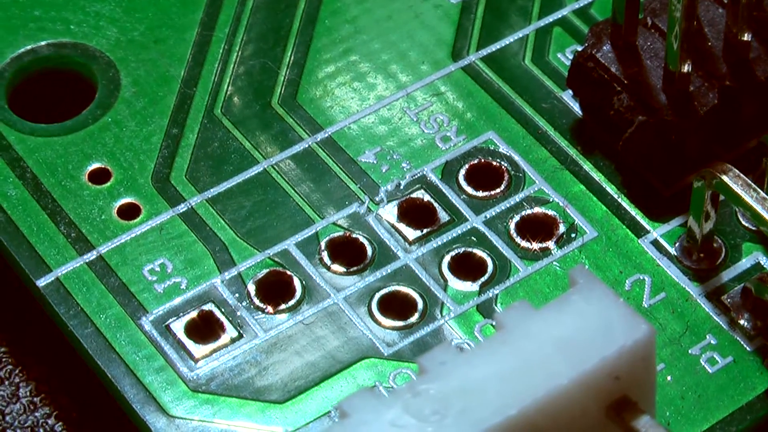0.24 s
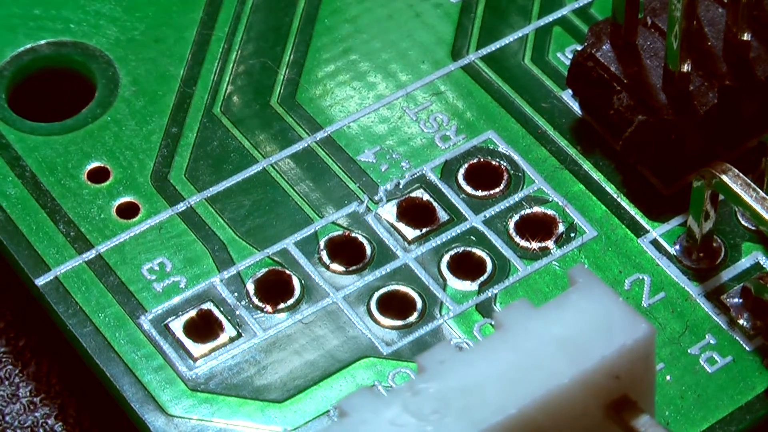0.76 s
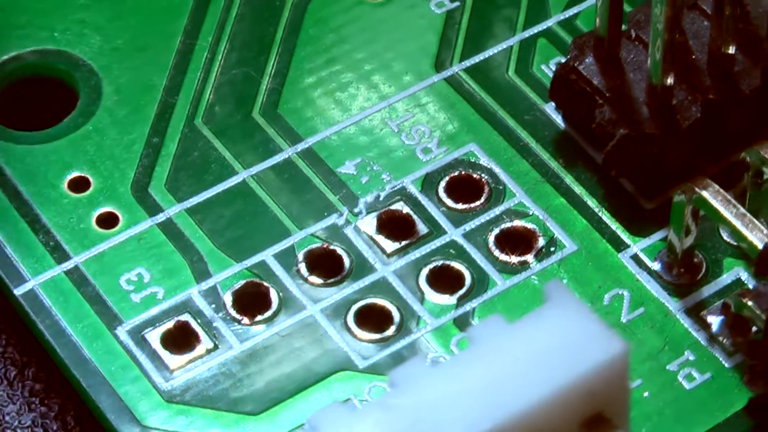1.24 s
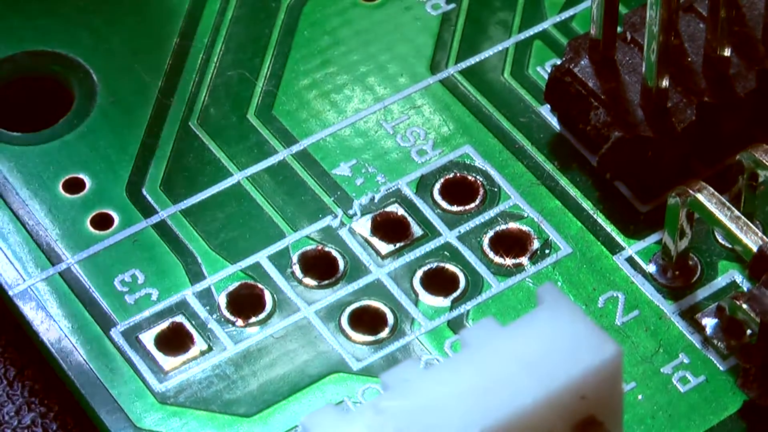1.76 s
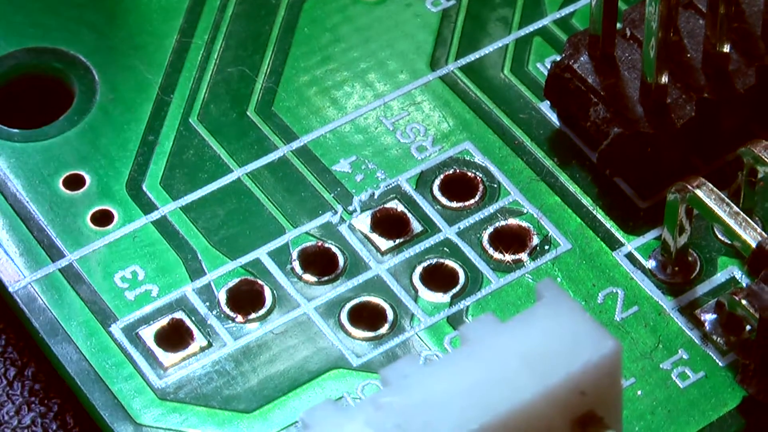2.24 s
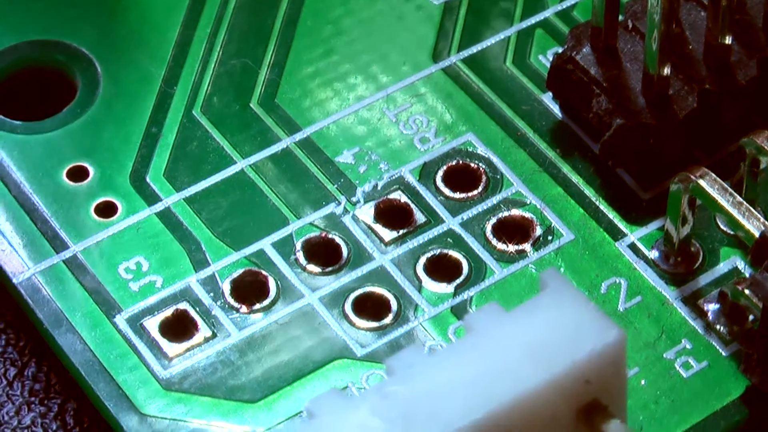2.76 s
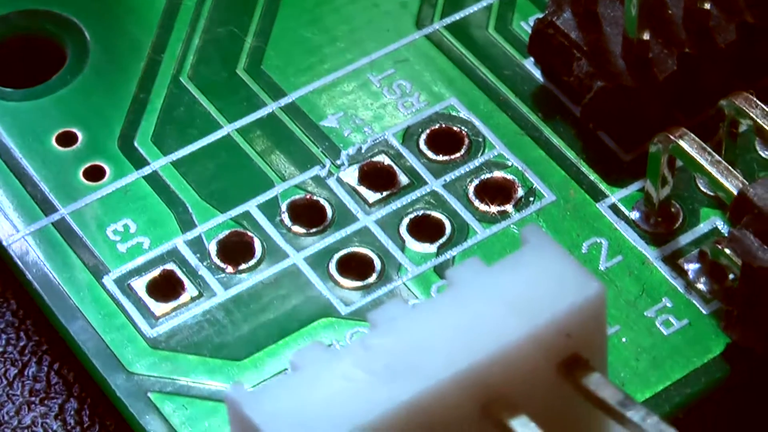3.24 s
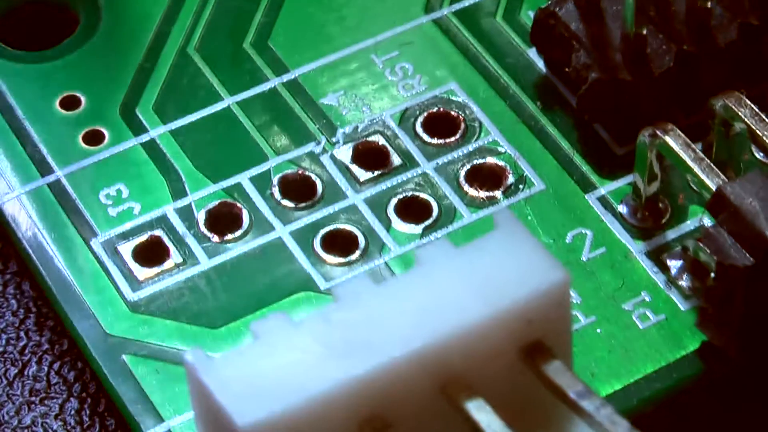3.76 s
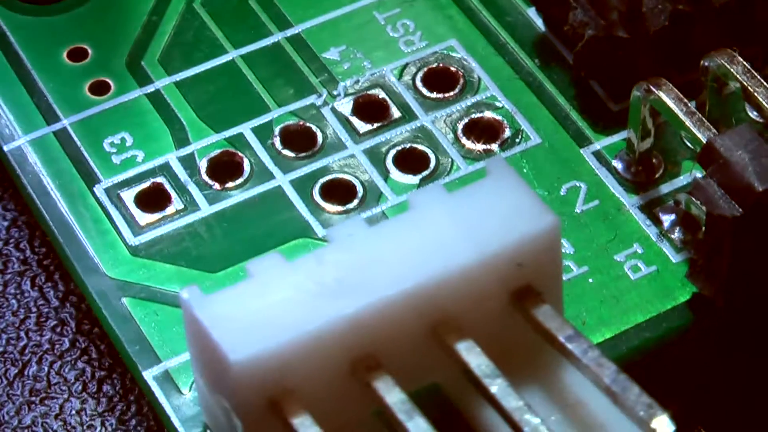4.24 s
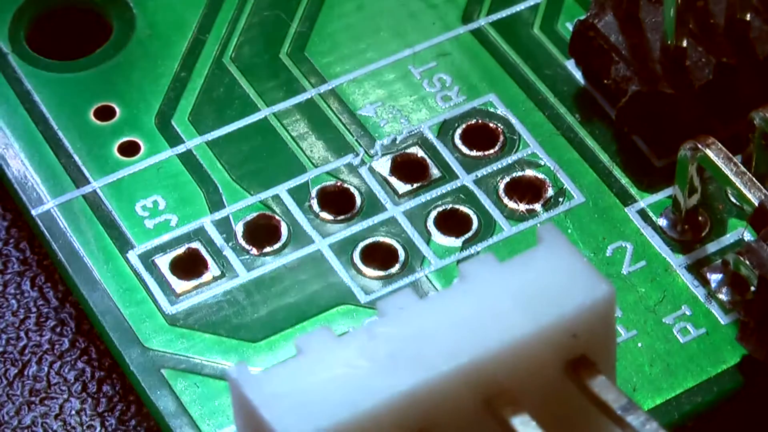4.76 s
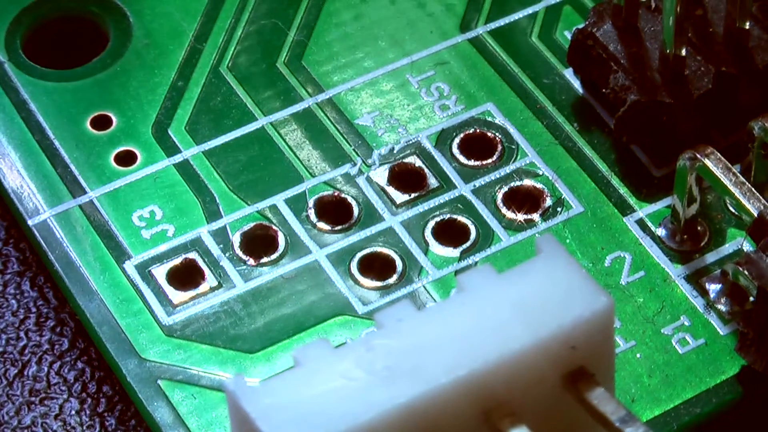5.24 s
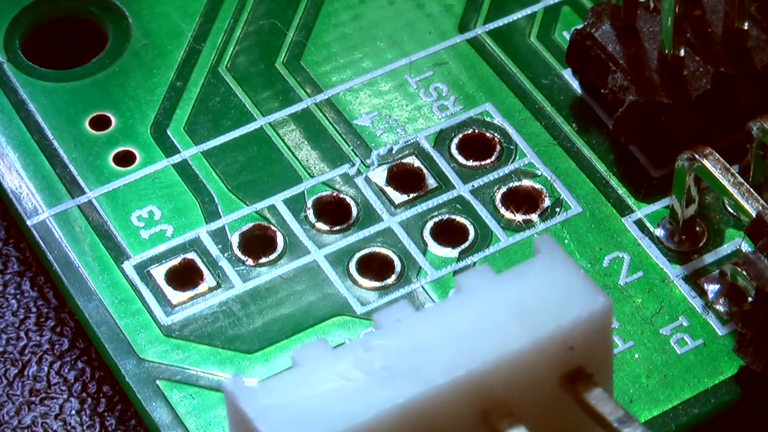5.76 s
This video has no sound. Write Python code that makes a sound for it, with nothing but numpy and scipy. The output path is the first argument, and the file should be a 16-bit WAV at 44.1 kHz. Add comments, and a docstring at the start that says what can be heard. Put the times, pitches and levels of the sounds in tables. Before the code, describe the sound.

Heard close up in a quiet room, a sharp click and a bump lead into the stuttering creak of a stiff metal stand being adjusted. Light knocks and dry ticks follow. Then a circuit board is pushed across a mat, scraping twice in quick succession and brushing more softly afterwards. A few small taps end it, with faint cloth rustle and a low, steady fan hum underneath.

```python
"""A stiff joint creaks in quick jerks as a circuit board is pushed about under a microscope.
The joint of the stand sticks and slips, and each slip makes the stand ring; early on it also groans.
Later the board scuffs and catches on its mat. Small knocks and dry ticks are dotted throughout.
Behind it all the joint hisses as it rubs, a sleeve rustles and a small fan hums in a quiet room."""
import sys
import numpy as np
from scipy import signal
from scipy.fft import rfft, irfft
from scipy.io import wavfile
from scipy.ndimage import uniform_filter1d

SR = 44100
rng = np.random.default_rng(int(sys.argv[2]) if len(sys.argv) > 2 else 0)


def master_out(mix):
    """Clip the mix to full scale and print it as 16-bit PCM to the path in sys.argv[1]."""
    frames = np.transpose(np.atleast_2d(mix))
    ceiling = np.clip(frames, -1, 1)
    pcm = np.round(ceiling * 32767).astype(np.int16)
    wavfile.write(sys.argv[1], SR, pcm)


N = 264644

# Each jerk of the joint: (time [s], crack level [dB], thump level [dB])
JERKS = [(0.0376, -29.5, -39.5), (.18, -22.5, -34.5), (0.1937, -30.5, -42), (.563, -22, -40.5),
         (0.5692, -40, -42.5), (.577, -33, -41.5), (0.5875, -27.5, -34), (0.605, -26, -37.5),
         (.615, -36, -44), (0.6237, -29, -34), (0.635, -31, -34.5), (0.6468, -30, -40), (.665, -29.5, -45),
         (.6783, -30, -45), (.684, -38, -43), (0.694, -31, -47), (.7138, -27, -35), (0.7324, -26.5, -37),
         (0.7487, -24.5, -32.5), (0.756, -32, -51), (0.7692, -32, -36.5), (0.781, -30, -41),
         (.7934, -26, -35), (0.8041, -34, -60), (0.8154, -27.5, -40), (0.8242, -36.5, -43),
         (.842, -26, -37), (0.878, -48, -42), (0.8992, -29, -31.5), (0.924, -41, -40), (.9349, -18.5, -28),
         (0.9739, -30, -37.5), (.996, -19, -31), (1.016, -35, -34), (1.0397, -25.5, -29),
         (1.0944, -25.5, -33), (1.115, -23.5, -29.5), (1.133, -17, -31), (1.151, -23.5, -38),
         (1.1668, -25, -33), (1.1906, -33, -36.5), (1.2122, -19.5, -29), (1.35, -25, -32.5),
         (1.3642, -26.5, -37), (1.3892, -23, -31), (1.4059, -20, -33.5), (1.4238, -39, -41),
         (1.4363, -37.5, -36), (1.4486, -24.5, -35), (1.4637, -25.5, -36.5), (1.4825, -48.5, -41),
         (1.4964, -26.5, -32), (1.509, -18.5, -31.5), (1.529, -28, -41), (1.5418, -15.5, -26.5),
         (1.5569, -14.5, -29), (1.5797, -20.5, -35.5), (1.6693, -17, -30)]
# How the jerks change colour as the joint turns: (time [s], squeak pitch [Hz], squeak boost [dB],
# base boost [dB], snap boost [dB])
JOINT_COLOUR = [(.04, 5740, -14, -8.5, -2.5), (.18, 7070, -1, -3.5, -13), (.565, 4670, 5.5, 5.5, -16),
                (.588, 6030, 4.5, -0.5, -5.5), (.66, 6260, 1, -10, -9), (.70, 5620, 5, -14, -7),
                (.81, 5580, -2, -4.5, -8), (.89, 5250, -13, -2, -9), (1.0, 5400, -4, -1, -9),
                (1.04, 4650, -12, -2, -19.5), (1.14, 4740, -0.5, 1.5, -11), (1.36, 4820, -7, 0, -12.5),
                (1.46, 4620, -2.5, 3.5, -25), (1.55, 4670, -6.5, -0.5, -18), (1.67, 4450, -1.5, 3, -16.5)]
# Rubbing between jerks, one list a push: (time [s], grind level [dB], hiss level [dB])
JOINT_RUBBING = [
    [(.56, -62, -76), (.6, -40, -57), (.7, -49, -59), (.78, -48, -47), (.87, -70, -61), (.93, -80, -82),
     (1.03, -80, -48), (1.08, -80, -70)],
    [(1.09, -38, -63), (1.16, -41, -47), (1.25, -53.5, -64)],
    [(1.35, -60, -71), (1.45, -58.5, -62), (1.56, -34, -45), (1.63, -51, -63)],
]
# The notes that the joint and the stand ring at; a wider note dies sooner:
# (pitch [Hz], width [Hz], level [dB], left over right [dB], left ahead by [rad])
JOINT_NOTES = [(2557, 164, -3.5, 1, 0.58), (2945, 110, 0, 3, -0.75), (3510, 82, 3, 5.5, 0.68),
               (4055, 43, 6.5, 5, 0.42), (4560, 96, -4, 9, 0.98), (5460, 200, -2, 7, -0.48),
               (6310, 110, -11, -2, 0.33), (7180, 310, -9.5, 7, -0.79), (7930, 430, -14, 7, -0.88),
               (9470, 450, 1.5, 2.2, -0.15), (10640, 250, -6.5, -4, -0.66), (10970, 520, -13, -15, 0.17),
               (13630, 1100, -7, 3.5, 0.38), (15260, 380, -6, -4, -0.36), (14700, 460, -20, -7, -0.18)]
STAND_NOTES = [(183.5, 40, 1.5, 5, 0.058), (205.6, 18.6, -1, 2, -0.54), (223, 30, -2.5, 0, -0.058),
               (286, 23, -1.5, -2, 0.17), (316.5, 17, 2, -1.5, 0.73), (477, 39, -8.5, 7.5, -0.59),
               (560.5, 27, -3.5, 2, 0.65), (652, 22.5, -3.5, 3, 0.3), (809, 92, -9.5, 0, -0.15),
               (872, 36, -0.5, -6, 0.92), (958, 57, -0.5, -3, 0.93), (1086, 32, -7, 9.5, -0.62),
               (1167, 28, -6, 2, -0.81), (1207, 27, 0, -6.5, -0.32), (1306, 105, -3.5, 5, -0.97),
               (1465, 39.5, 1, -4, 0.55), (1624, 140, -5, 0, 1.58), (1855, 37, -7.5, -2, -0.25),
               (2074, 90, -6.5, 0, 0.52)]
def stand_creak():
    """Each jerk cracks, snaps and squeaks in the joint and shakes the arm and base of the stand."""
    times, crack_db, thump_db = np.transpose(JERKS)
    colour_times, *colour = np.transpose(JOINT_COLOUR)
    squeak_hz, squeak_db, base_db, snap_db = (np.interp(times, colour_times, c) for c in colour)
    squeak_db += 2.5 * rng.standard_normal(len(times))
    snap_db += 0.23 * (crack_db + 23.5)  # jerks harder than the usual -23.5 dB snap brighter
    grind = loudness_curve(JOINT_RUBBING, column=1) * grit(3000, spread_db=1.5)
    snap = jolts(times, crack_db + snap_db + 18, rise_s=0.00076, fall_s=0.0019, kick=0.29)
    crack = jolts(times, crack_db + 2.5, rise_s=0.00066, fall_s=0.00082, kick=1.1)
    arm = jolts(times, thump_db + 12.5, rise_s=0.00069, fall_s=0.0065, kick=1.99)
    base = jolts(times, thump_db + base_db + 14, rise_s=0.00073, fall_s=0.002, kick=2.53)
    out = ring(crack, JOINT_NOTES[:7]) + ring(snap, JOINT_NOTES[7:])
    out += ring(base + grind, STAND_NOTES[:11]) + ring(arm + gain(-6.5) * grind, STAND_NOTES[11:])
    t = np.arange(600) / SR
    for start, hz, db in zip(times, squeak_hz, crack_db + squeak_db):
        squeak = rise_and_fall(t, 0.0011, 0.0011) * np.sin(2 * np.pi * hz * t)
        add(out, start, gain(db + np.array([[2.5], [-2.5]])) * squeak)  # louder on the left
    return cut_bass(out, hz=148, order=6)

# The groan during the first push: (time [s], pitch [Hz], level [dB])
GROAN_PATH = [(.625, 661, -60), (.644, 650, -40.5), (.68, 647.6, -49.5), (.744, 663.5, -45),
              (.836, 635, -52.5), (.9, 658, -63)]
def stand_groan():
    """One note of the stand sounds on, nearly steady, with two rougher overtones above it."""
    times, hz, db = np.transpose(GROAN_PATH)
    t = np.arange(times[0], times[-1], 1 / SR)
    phase = 2 * np.pi * np.cumsum(np.interp(t, times, hz)) / SR
    wobble = unit_level(uniform_filter1d(rng.standard_normal((3, len(t))), size=500, axis=1))
    overtones = (1 + 0.53 * wobble[1]) * np.sin(2 * phase) + (1 + wobble[2]) * np.sin(3 * phase)
    tone = np.sqrt(2) * ((1 + 0.25 * wobble[0]) * np.sin(phase) + gain(-15) * overtones)
    out = np.zeros(N)
    add(out, times[0], gain(np.interp(t, times, db)) * tone * signal.windows.tukey(len(t), .1))
    return out

# Each drag of the board on its mat: (time of full pressure [s], level [dB], hold [s])
BOARD_DRAGS = [(3.44, -42.5, 0.0075), (3.529, -29.5, 0.0049), (3.744, -33.5, 0.013), (3.762, -30.5, .012),
               (3.865, -44.5, 0.013), (3.91, -45.5, 0.011), (3.964, -48, 0.013), (4.417, -46, .004),
               (4.495, -50.5, 0.048), (4.704, -47.5, 0.045), (4.788, -47, .01), (4.997, -51.5, .006),
               (5.19, -54, 0.02)]
# The edge of the board catches: (time [s], level [dB])
EDGE_CATCHES = [(3.517, -33), (3.529, -32.5), (3.548, -25), (3.555, -23.5), (3.566, -48.5), (3.576, -24),
                (3.735, -24.5), (3.745, -27), (3.762, -28), (3.771, -27), (3.794, -25), (3.965, -35.5),
                (4.416, -37), (4.722, -31.5), (4.784, -36)]
# The notes that the board rings at:
# (pitch [Hz], width [Hz], level [dB], left over right [dB], left ahead by [rad])
BOARD_NOTES = [(106, 45, -12.5, -2, 0.23), (227, 84, -17, 17, -0.87), (500, 72, -6, -1, -0.4),
               (669, 36, -3.5, 1, 0.2), (816, 41, 2.5, -3.5, -0.011), (916, 35, -3, -4, -0.54),
               (1014, 133, -9.5, -6, 0.47), (1230, 18, -15, 10, 1), (1424, 44, -9.5, -3, -0.44),
               (1783, 210, -17.5, -5.5, -0.41), (2145, 29, -12, -3, 1), (2340, 170, -26, 0, 0.9),
               (3080, 300, -24, 3.5, 0.36), (3730, 490, -32, -4, 0.1), (4744, 150, -21, -0.5, 0.2),
               (5820, 290, -28, 0, 0.3), (8650, 1600, -41, 0, 0.56), (13600, 2700, -48, -1, -0.31)]
def board_scuffs(press_db_per_s=1200, lift_db_per_s=422):
    """Grit and catches make the dragged board ring; firm strokes sound brighter than light ones."""
    t, pressure = np.arange(N) / SR, np.zeros(N)
    for at, db, hold_s in BOARD_DRAGS:
        pressing_db = press_db_per_s * np.clip(at - t, 0, .3)
        lifting_db = lift_db_per_s * np.clip(t - at - hold_s, 0, 1)
        pressure += gain(db - pressing_db - lifting_db)
    times, catch_db = np.transpose(EDGE_CATCHES)
    scrape = gain(-6) * pressure * grit(3000, spread_db=3)
    scrape += jolts(times, catch_db + 9.5, rise_s=0.0006, fall_s=0.0015, kick=0.58)
    firmness = (pressure / pressure.max()) ** 0.28
    return ring(scrape, BOARD_NOTES[:7]) + gain(-7) * ring(firmness * scrape, BOARD_NOTES[7:])

# Small knocks on the desk: (time [s], level [dB], pitch [Hz])
DESK_KNOCKS = [(0.113, -20.5, 163.6), (.484, -31, 170), (2.545, -37, 194), (2.672, -36.5, 865),
               (2.795, -36, 221), (2.806, -33, 280), (2.824, -39.5, 307), (2.969, -34, 274),
               (3.066, -33.5, 686), (5.099, -40.5, 465), (5.533, -37, 459), (5.723, -36.5, 236),
               (5.755, -39, 649), (5.844, -36, 473)]
def desk_knocks(rise_s=0.0026, die_away_s=0.084):
    """A soft bump gives a quickly dying tone and a puff of noise around the same pitch."""
    out, t = np.zeros(N), np.arange(4096) / SR
    shape = (1 - np.exp(-t / rise_s)) * gain(-60 * t / die_away_s)
    for start, db, hz in DESK_KNOCKS:
        puff = band_around(rng.standard_normal(len(t)), hz, octaves=1.68)
        add(out, start, gain(db) * shape * (0.55 * np.sin(2 * np.pi * hz * t) + 0.37 * puff))
    return out

# Light, dry ticks: (time [s], level [dB], middle pitch [Hz], fade time [s])
DRY_TICKS = [(.111, -55, 12000, 0.0046), (.122, -33.5, 2230, 0.00088), (.17, -19.5, 2430, 0.00041),
             (.177, -11, 2860, 0.00039), (0.18, -25.5, 2580, 0.0029), (.194, -34.5, 2600, 0.0028),
             (.482, -51, 1160, 0.0093), (0.565, -33, 2500, 0.0047), (1.977, -47.5, 7500, 0.0013),
             (2.07, -51, 3970, 0.0012), (2.088, -56, 11500, .0027), (2.185, -44, 8000, 0.00093),
             (2.239, -51.5, 1100, 0.005), (2.32, -48.5, 1150, 0.0032), (2.659, -53, 3460, 0.015),
             (2.899, -56.5, 2660, .005), (2.974, -35, 2600, 0.00096), (2.9735, -41, 9000, 0.0007),
             (3.061, -56.5, 2860, .012), (5.098, -59, 2800, 0.031), (5.714, -49.5, 1200, 0.01),
             (5.79, -54.5, 5000, .0025), (5.845, -50, 6040, 0.0039), (5.848, -47.5, 1950, .0091)]
def dry_ticks():
    """Each tick is a tiny burst of noise, much alike on the left and right."""
    out, t = np.zeros((2, N)), np.arange(2048) / SR
    for start, db, hz, fall_s in DRY_TICKS:
        hiss = rng.standard_normal((2, len(t)))
        band = band_around(hiss + 1.3 * hiss[0], hz, octaves=1.3)
        add(out, start, gain(db) * band * rise_and_fall(t, 0.0007, fall_s))
    return out

def metal_ping(start_s=.181, db=-53, hz=7070, die_away_s=.11):
    """A small metal part of the stand rings once with a thin, dying tone."""
    out, t = np.zeros(N), np.arange(6000) / SR
    add(out, start_s, gain(db - 60 * t / die_away_s) * np.sin(2 * np.pi * hz * t))
    return out

# How loud the hiss is: the joint's fine rubbing hiss during the creak, sleeve rustle otherwise:
# (time [s], coarse level [dB], fine level [dB])
HISS_LEVELS = [(0, -67.5, -74), (.55, -80, -79.5), (.68, -76, -62), (.95, -78, -79.5), (1.55, -70, -76),
               (1.75, -73.5, -77.5), (2.5, -70.5, -78), (2.68, -61, -72), (2.82, -69.5, -77),
               (2.97, -62, -75), (3.15, -71.5, -78.5), (3.68, -66, -74), (4.18, -68.5, -74),
               (4.5, -64.5, -73), (4.92, -68.5, -73.5), (5.11, -61, -68.5), (5.2, -71, -77),
               (5.55, -60, -70.5), (5.74, -64, -76), (5.86, -60.5, -66.5), (6, -64, -76)]
# The tone colour of the coarse and of the fine hiss: (frequency [Hz], level [dB])
COARSE_HISS = [(300, -7), (1000, -1), (2000, -6), (3500, -7.5), (6000, -15), (8500, -30.5)]
FINE_HISS = [(4000, -23), (7000, -4.5), (10000, 0), (15500, -3), (15900, -47)]
def rubbing_and_rustle():
    """The rubbing joint and the moving sleeve make a coarse and a fine hiss that swell separately."""
    coarse = loudness_curve([HISS_LEVELS], column=1) + loudness_curve(JOINT_RUBBING, column=2)
    fine = loudness_curve([HISS_LEVELS], column=2)
    return coarse * noise(COARSE_HISS, flicker_db=1.2) + fine * noise(FINE_HISS, flicker_db=.6)

# The fan's tones: (pitch [Hz], width [Hz], level [dB], steady part over wavering part [ratio])
FAN_TONES = [(156.3, 22, -62.5, 2.1), (300.7, 19, -56, 3.16), (11900, 8, -97, 1.1)]
def fan_hum():
    """A small fan hums: each steady tone is mixed with slow noise that makes it waver."""
    out, t = np.zeros(N), np.arange(N) / SR
    for hz, width, db, steady in FAN_TONES:
        smoothing = [1, -np.exp(-np.pi * width / SR)]
        waver = rng.standard_normal(N) + 1j * rng.standard_normal(N)
        waver = signal.lfilter([1], smoothing, signal.lfilter([1], smoothing, waver))
        tone = (steady + waver / np.std(waver)) * np.exp(2j * np.pi * hz * t)
        out += gain(db) * unit_level(tone.real)
    return out

def room_echo(sound, die_away_s=0.068):
    """Desk and walls throw back a short echo without bass."""
    t = np.arange(9000) / SR
    tail = rng.standard_normal((2, len(t))) * gain(-60 * t / die_away_s) * (t > .003)
    tail = signal.sosfilt(signal.butter(2, [600, 9000], "bandpass", fs=SR, output="sos"), tail)
    return signal.oaconvolve(sound, tail / np.linalg.norm(tail[0]), axes=1)[:, :N]

# The background noise of the room: (frequency [Hz], level [dB])
ROOM_HUSH = [(15, -65), (25, -50), (96, -10.5), (148, -4.5), (241, 1.5), (299, -3.5), (351, -4.5),
             (413, -1), (746, -9.5), (831, -6.5), (1280, -17), (3200, -24.5), (8000, -42.5), (14500, -42.5),
             (15700, -51)]
def room_hush():
    """The quiet room gives a faint, low, even rush."""
    return gain(-57) * noise(ROOM_HUSH, flicker_db=.7)

# How alike the noise is on the left and right: (frequency [Hz], likeness [0 to 1])
SIDE_LIKENESS = [(60, 0.54), (130, 0.66), (290, 0.76), (640, 0.86), (1410, 0.13), (3100, 0.33),
                 (6820, 0.64), (15000, 1)]
def noise(spectrum, flicker_db):
    """Stereo noise with the given tone colour, flickering a little in drifting patches."""
    frames, hz = N // 256 + 5, np.fft.rfftfreq(1024, 1 / SR)
    a, b, c, d, patches = rng.standard_normal((frames, 513, 5)).T
    patches = unit_level(uniform_filter1d(uniform_filter1d(patches, size=12, axis=0), size=10, axis=1))
    likeness = value_at(SIDE_LIKENESS, hz)[:, None]
    left = a + 1j * b
    right = likeness * left + np.sqrt(1 - likeness ** 2) * (c + 1j * d)
    slices = np.array([left, right]) * gain(value_at(spectrum, hz)[:, None] + flicker_db * patches)
    return unit_level(signal.istft(slices, nperseg=1024, noverlap=768)[1][:, :N])

def ring(shaking, notes):
    """A shaken object rings at its own notes; each reaches the two microphones differently."""
    t, side, response = np.arange(4000) / SR, np.array([[.5], [-.5]]), 0
    for k, (hz, width, db, pan_db, lead) in enumerate(notes):
        swing = (-1) ** k * np.sin(2 * np.pi * hz * t + side * lead)  # neighbours start opposite ways
        response += width * gain(db + side * pan_db) * np.exp(-np.pi * width * t) * swing
    response /= np.linalg.norm(response.mean(0))
    return signal.oaconvolve(shaking[None], response, axes=1)[:, :N]

def jolts(times, levels_db, rise_s, fall_s, kick):
    """One clean kick at each time, with a spray of noise as the contact breaks loose in tiny steps."""
    out, shape = np.zeros(N), rise_and_fall(np.arange(800) / SR, rise_s, fall_s)
    for start, db in zip(times, levels_db):
        spray = rng.standard_normal(len(shape)) * shape
        add(out, start + rise_s, gain(db) * np.array([kick]))
        add(out, start, gain(db) * spray / np.linalg.norm(spray))
    return out

def grit(per_s, spread_db):
    """Rough surfaces rub in scattered clicks of uneven size."""
    sizes = gain(spread_db * np.minimum(rng.exponential(1, N), 5))
    return unit_level(sizes * rng.choice([-1, 1], N) * (rng.random(N) < per_s / SR))

def band_around(hiss, hz, octaves):
    """Keep the part of a hiss that lies near one pitch."""
    freqs = np.fft.rfftfreq(hiss.shape[-1], 1 / SR) + 1
    return unit_level(irfft(rfft(hiss) * np.exp(-2 * (np.log2(freqs / hz) / octaves) ** 2)))

def loudness_curve(tables, column):
    """Volume over time from one dB column of each table; silent outside them."""
    t, tables = np.arange(N) / SR, map(np.array, tables)
    return sum(gain(np.interp(t, rows[:, 0], rows[:, column], left=-200, right=-200)) for rows in tables)

def rise_and_fall(t, rise_s, fall_s):
    return (1 - np.exp(-t / rise_s)) * np.exp(-t / fall_s)

def value_at(points, hz):
    freqs, values = np.transpose(points)
    return np.interp(np.log(hz + 1), np.log(freqs + 1), values)

def gain(db):
    return 10 ** (np.asarray(db) / 20)

def unit_level(sound):
    return sound / np.sqrt(np.mean(sound ** 2) + 1e-20)

def add(mix, start_s, sound):
    part = mix[..., round(start_s * SR):][..., :sound.shape[-1]]
    part += sound[..., :part.shape[-1]]

def scene():
    """The sounds on the desk and their echo, over the room, the rubbing and rustling, and the fan."""
    desk = stand_creak() + stand_groan() + board_scuffs() + desk_knocks() + dry_ticks() + metal_ping()
    desk = cut_bass(desk, hz=110, order=2)  # small objects give off little bass
    return desk + room_hush() + gain(-13) * room_echo(desk) + rubbing_and_rustle() + fan_hum()

def cut_bass(sound, hz, order):
    return signal.sosfilt(signal.butter(order, hz, "highpass", fs=SR, output="sos"), sound)

def record(dry, top_hz=16800):
    """Two close microphones hear almost the same bass; the very highest treble is cut off."""
    mid, side = (dry[0] + dry[1]) / 2, (dry[0] - dry[1]) / 2
    side -= 0.86 * signal.sosfiltfilt(signal.butter(3, 330, fs=SR, output="sos"), side)
    pair = np.array([mid + side, mid - side])
    return signal.oaconvolve(pair, signal.firwin(511, top_hz, window=("kaiser", 9), fs=SR)[None], "same")

dry = scene()
out = record(dry)
master_out(out)
```